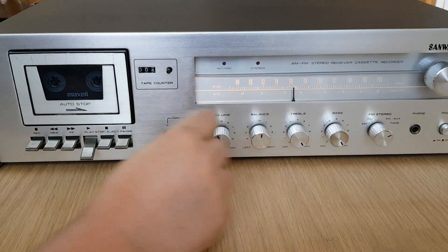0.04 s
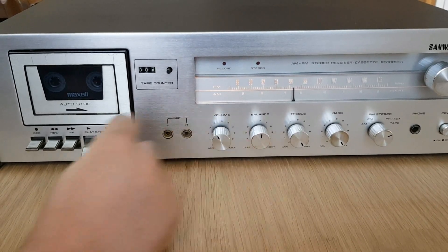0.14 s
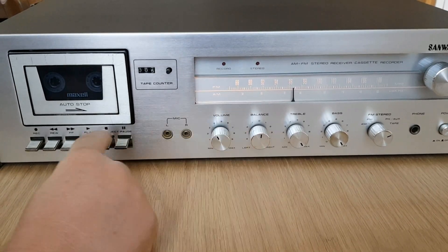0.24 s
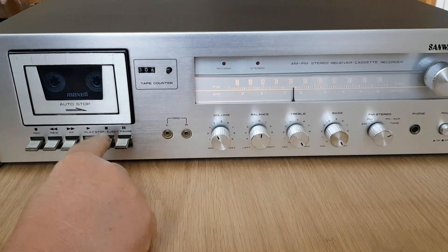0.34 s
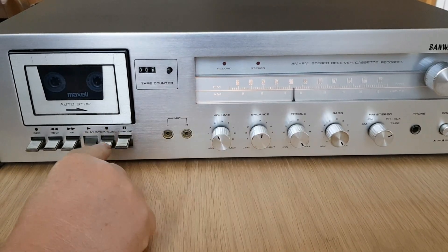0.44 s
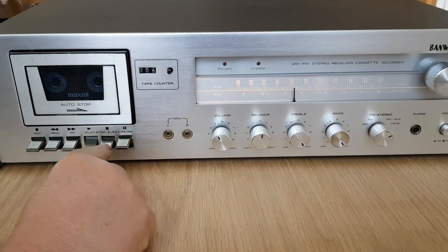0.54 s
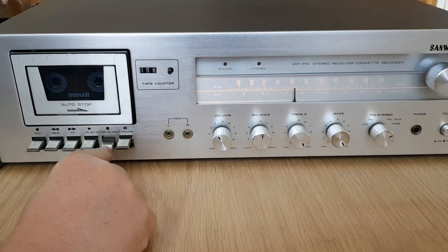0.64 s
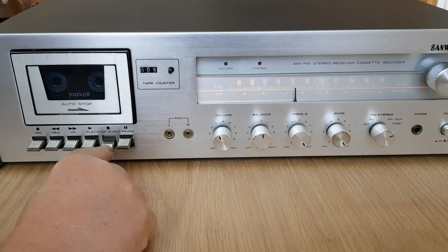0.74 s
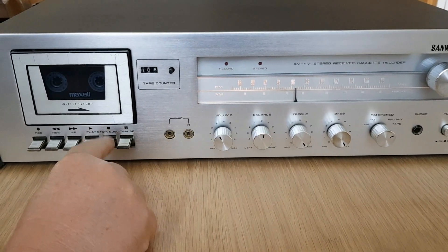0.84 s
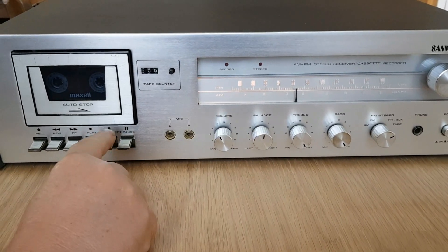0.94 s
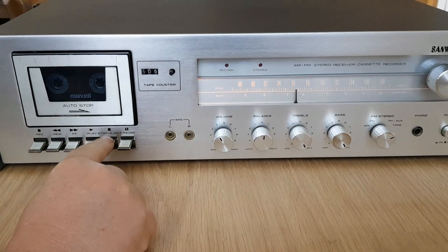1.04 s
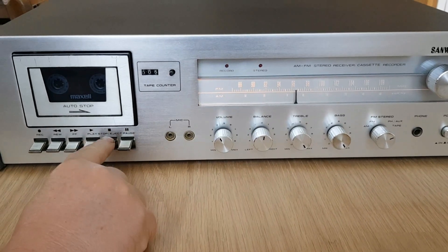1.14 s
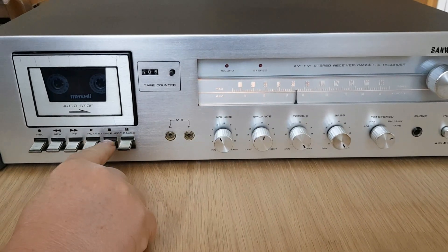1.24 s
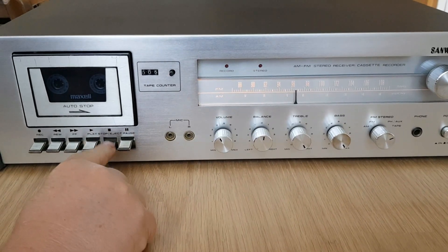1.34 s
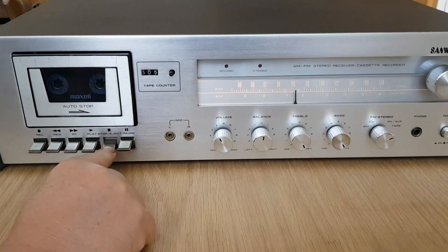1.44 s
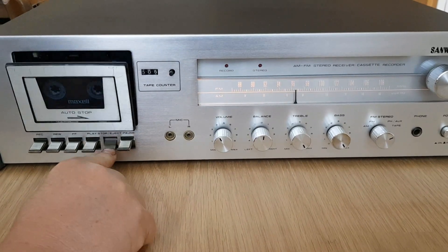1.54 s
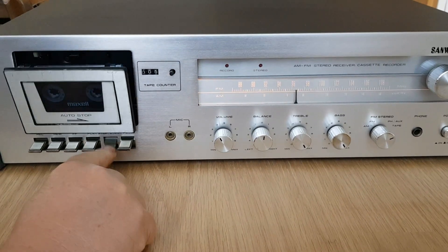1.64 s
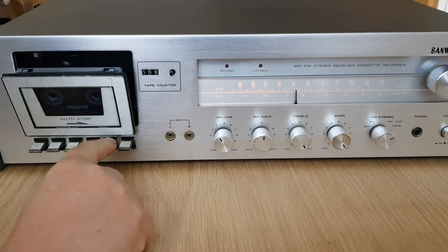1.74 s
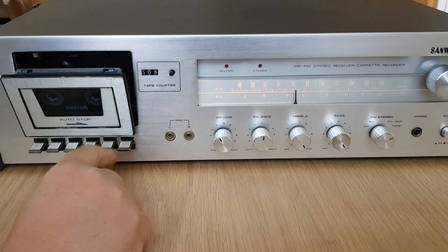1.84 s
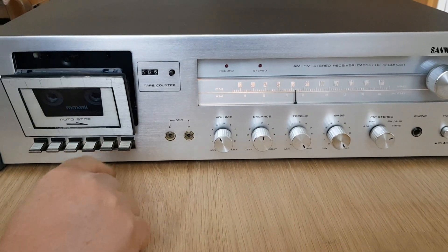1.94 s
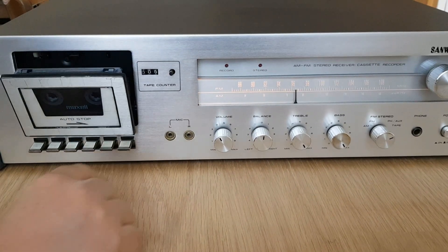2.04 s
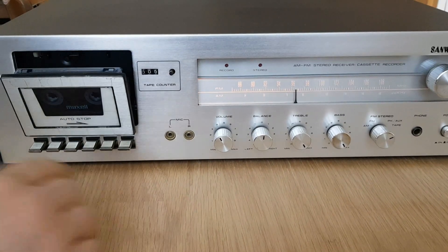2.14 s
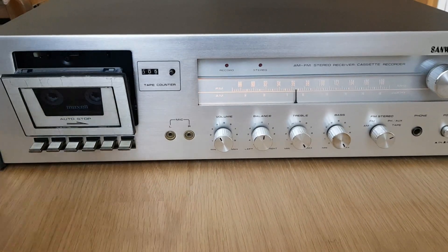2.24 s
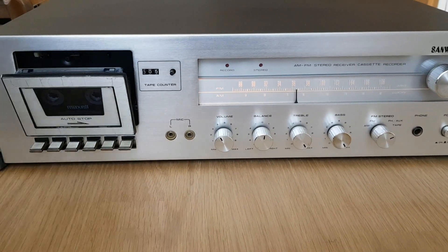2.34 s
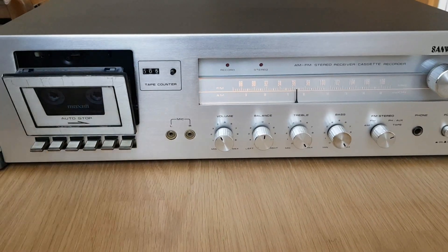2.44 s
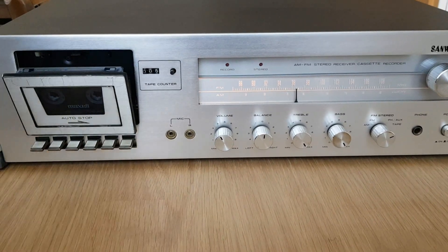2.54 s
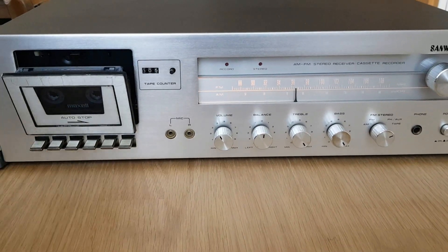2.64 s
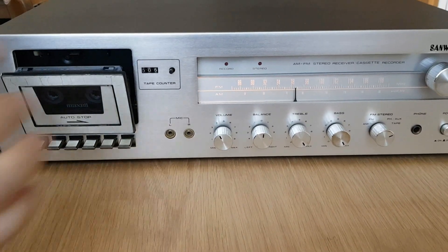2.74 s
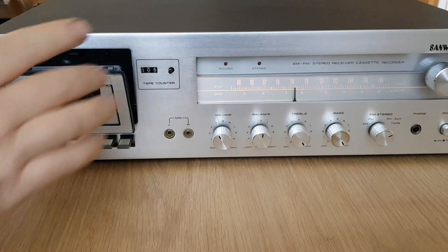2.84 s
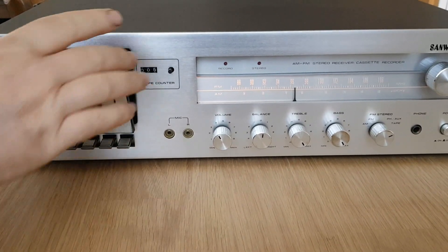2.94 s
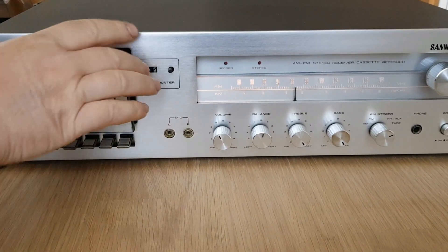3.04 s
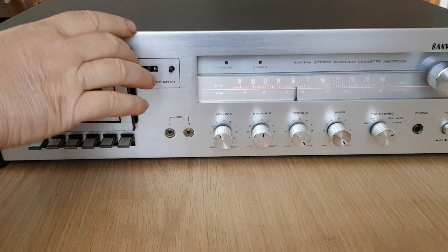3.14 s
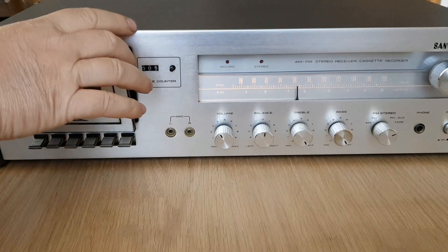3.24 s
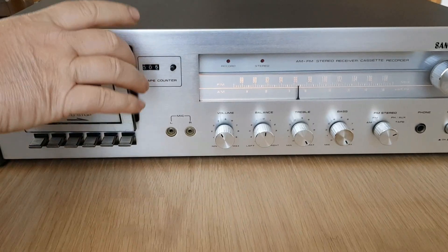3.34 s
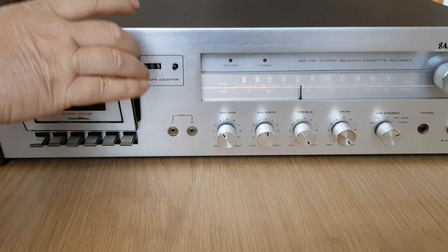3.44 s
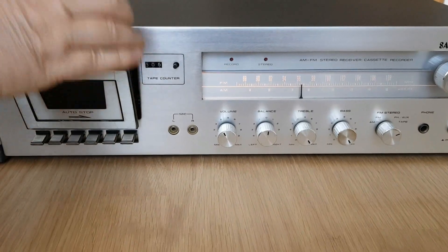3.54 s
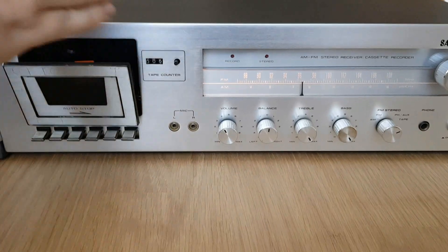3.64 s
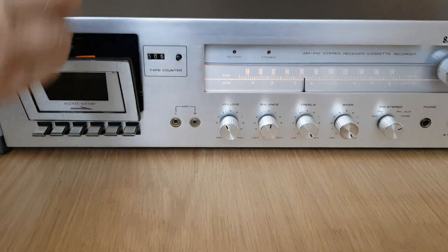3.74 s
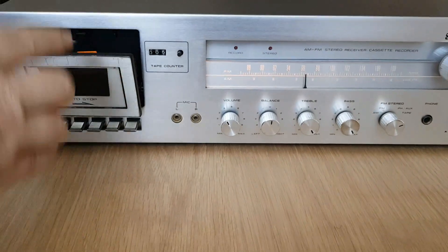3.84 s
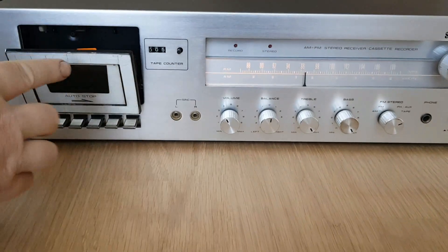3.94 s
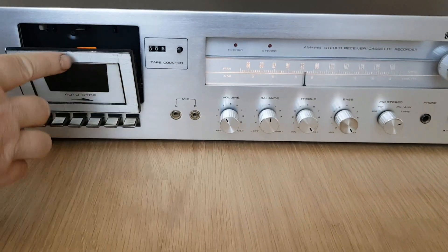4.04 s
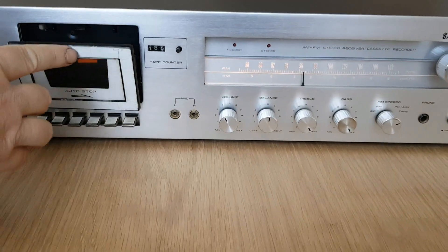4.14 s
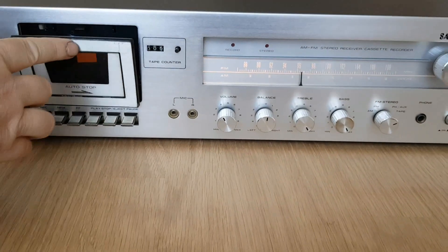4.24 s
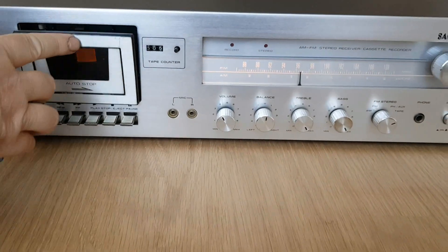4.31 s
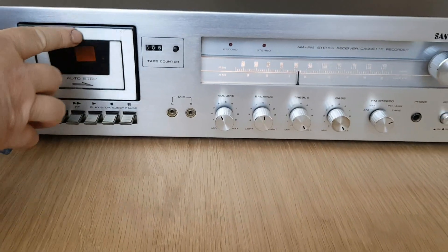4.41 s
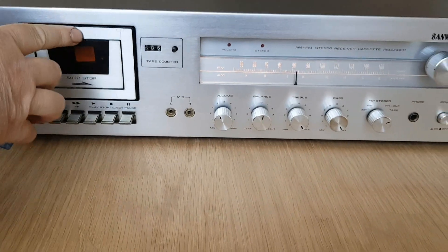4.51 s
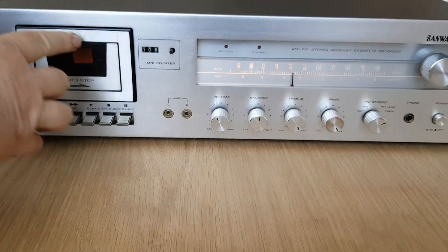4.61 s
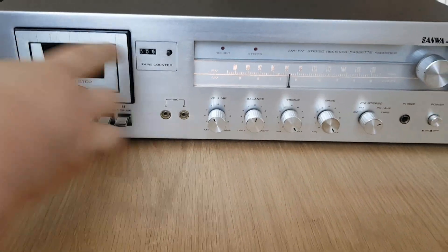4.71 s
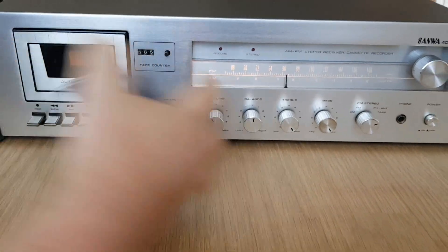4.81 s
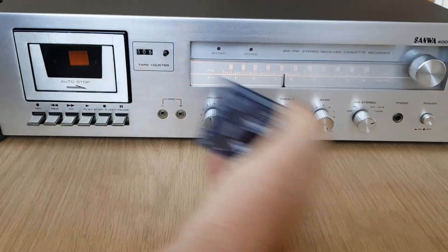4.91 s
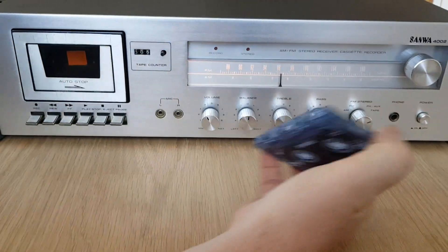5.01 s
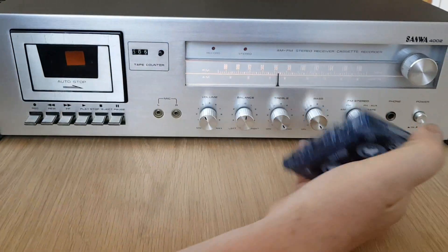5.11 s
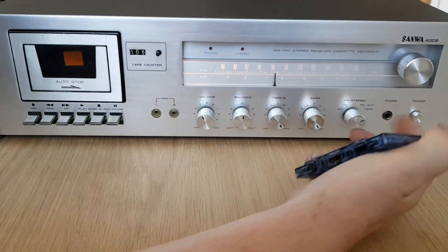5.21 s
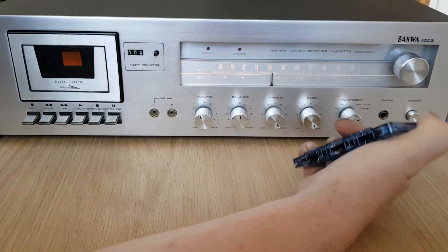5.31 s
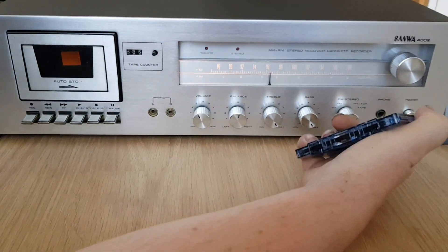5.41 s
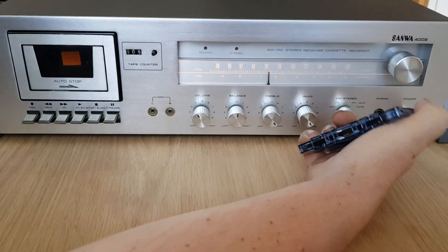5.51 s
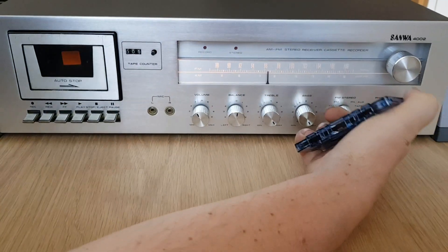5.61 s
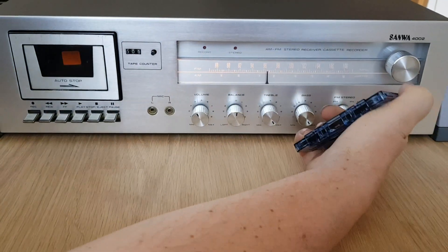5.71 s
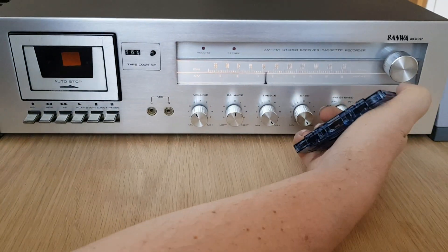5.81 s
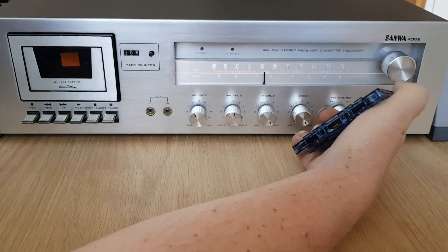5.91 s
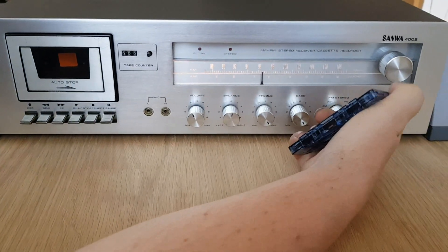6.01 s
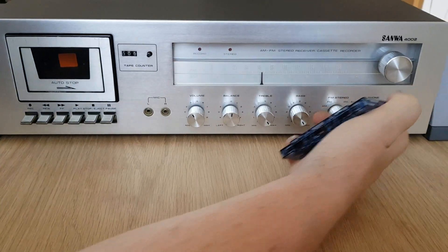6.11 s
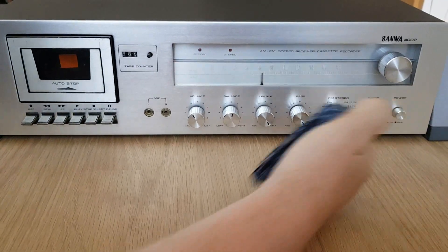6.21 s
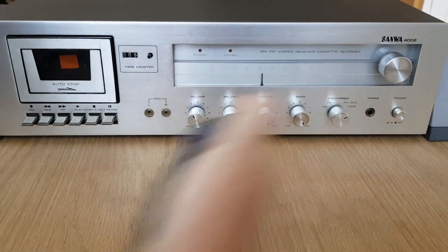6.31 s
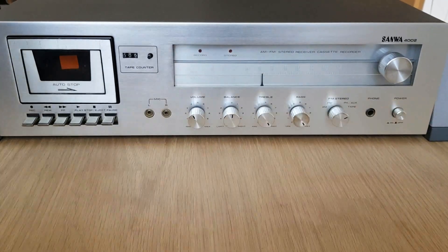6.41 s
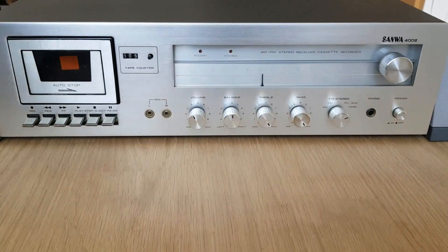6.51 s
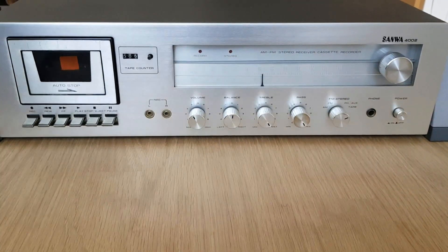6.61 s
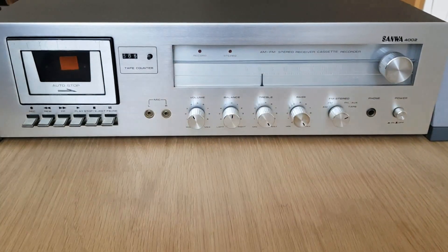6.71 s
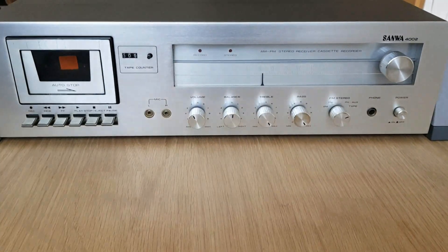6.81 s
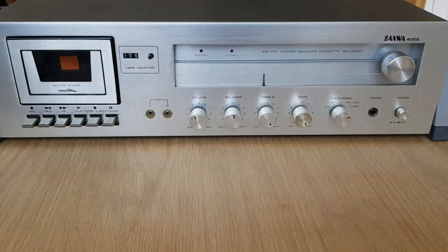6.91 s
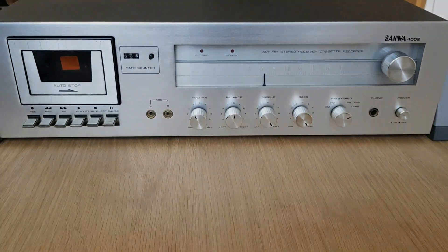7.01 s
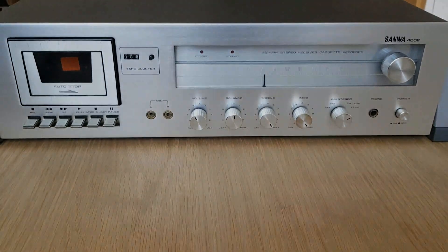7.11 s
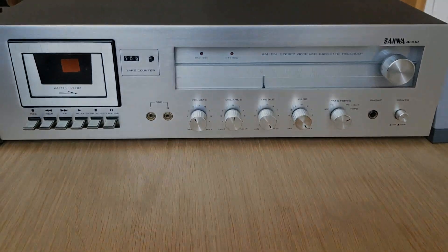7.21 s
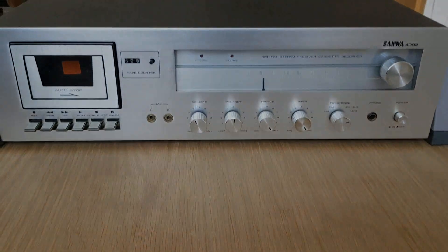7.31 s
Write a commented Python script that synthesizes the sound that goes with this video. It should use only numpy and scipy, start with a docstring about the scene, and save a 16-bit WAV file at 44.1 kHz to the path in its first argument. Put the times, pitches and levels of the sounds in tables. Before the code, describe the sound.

Close metallic and plastic clunks from a tape deck's keys and door, small cassette rattles and handling thuds, over faint hiss in a small room.

```python
"""On a wooden table in a small room, the keys, latch and sprung door of a cassette deck clack beside a camera.
A cassette slides out and rattles in a hand. Each contact is a burst of uneven impacts that rings the metalwork
and knocks the cabinet; slides are clumped grains through the same parts, the door spring is a dying sine.
The left microphone faces the deck; the right one is shadowed and picks up the thuds of the hand that
holds the camera. Under it all lie hiss, a whirr that drops away early and a low hum, all filtered noise."""
import sys
import numpy as np
from scipy import signal
from scipy.fft import rfft, irfft, next_fast_len
from scipy.io import wavfile
from scipy.ndimage import uniform_filter1d, map_coordinates

SR = 44100
rng = np.random.default_rng(int(sys.argv[2]) if len(sys.argv) > 2 else 0)


def to_linear_factor(level_db):
    """Convert decibel levels (scalar or array-like) to linear amplitude factors."""
    exponent = np.asarray(level_db, float) / 20
    return 10 ** exponent


def output_pcm(signal):
    """Save a mono or channel-first signal as 16-bit PCM at the path in sys.argv[1].

    Samples are clipped to [-1, 1] before scaling.
    """
    pcm = np.clip(np.atleast_2d(signal).T, -1, 1) * 32767
    wavfile.write(sys.argv[1], SR, np.round(pcm).astype(np.int16))


N = 324352  # length in samples
SPAN = 32768  # samples in the transform of one contact or stroke
HELD = 0.55  # share of the ring time left while fingers touch the parts

# Metalwork and plastic ringing freely. Each row: pitch in Hz, strength in dB, t60 in s.
METAL_MODES = [(850, 0, 0.08), (1080, -1, 0.09), (1205, -4, 0.12), (1510, -2, 0.12), (1600, -2.5, 0.11),
               (1755, -2, 0.14), (2150, -5, 0.04), (3000, -4, 0.09), (4200, -1, 0.05)]


def unit(x):
    """Scale to rms 1."""
    return x / np.sqrt(np.mean(x ** 2) + 1e-20)


def unit_gain(response):
    """Rms gain of a response for white noise."""
    return np.sqrt(np.mean(np.abs(response) ** 2))


def peak(spectrum):
    """Scale a spectrum so that its wave peaks at 1."""
    return spectrum / np.max(np.abs(irfft(spectrum)))


def along(points, hz):
    """Read (Hz, value) points on a log frequency axis."""
    f, v = np.transpose(points)
    return np.interp(np.log(hz + 1), np.log(f + 1), v)


def wobble(rate):
    """A smooth random curve, rate knots a second."""
    return map_coordinates(rng.standard_normal(int(N * rate / SR) + 4), [np.arange(N) * rate / SR])


def spells(rows, edge_s):
    """Gain that swells at each start, holds and ebbs at each end."""
    t = np.arange(N) / SR
    gain = 0
    for start, end, db in rows:
        rise_and_ebb = np.clip(np.minimum(t - start, end - t) / edge_s + 0.5, 0, 1)
        gain = gain + to_linear_factor(db) * rise_and_ebb ** 2
    return gain


def filtered(x, response):
    """Shape x by a response given as a function of frequency."""
    m = next_fast_len(N + SR // 2)
    return irfft(rfft(x, m) * response(np.fft.rfftfreq(m, 1 / SR)), m)[..., :N]


def broad(f, centre_hz, sharp):
    """One heavily damped band-pass resonance; sharp is its Q."""
    damping = 1j * f * centre_hz / sharp
    return damping / (centre_hz ** 2 - f ** 2 + damping)


def modes(table, f):
    """Causal response of each exponentially decaying mode, one row a mode."""
    hz, db, t60 = np.transpose(table)[:, :, None]
    decay = np.log(1000) / np.maximum(t60, 0.005)
    w = 2 * np.pi
    return to_linear_factor(db) * w * hz / ((decay + 1j * w * f) ** 2 + (w * hz) ** 2)


def struck(table, centre_hz, slope_db):
    """Strength of each mode: falls off by octaves from the centre, a little different at every blow."""
    scatter_db = rng.normal(0, 3, len(table))
    octaves = np.log2(np.transpose(table)[0] / centre_hz)
    return to_linear_factor(scatter_db - slope_db * octaves ** 2)


def damped(table, share):
    """The same modes with scaled ring times, slightly detuned as the parts seat differently."""
    detune = rng.normal(0, 0.008, len(table))  # share of pitch, new at each contact
    rows = np.array(table) * [1, 1, share]
    return rows * [[1 + shift, 1, 1] for shift in detune]


def chatter(n, env, spiky_db):
    """Tiny impacts of very uneven size under an envelope."""
    return env * rng.standard_normal(n) * to_linear_factor(spiky_db * rng.exponential(size=n))


def paths(f, room_db):
    """Direct sound plus a fresh noise tail; low mids arrive most alike, deepest bass and treble differ."""
    # Reverberation of the small room. Each row: frequency in Hz, t60 in s.
    room_t60 = [(100, 0.44), (1500, 0.4), (4000, 0.34), (15000, 0.19)]
    # How alike the near sound is at left and right. Each row: frequency in Hz, likeness from 0 to 1.
    likeness = [(60, 0.2), (250, 1), (640, 0.9), (1200, 0.032)]
    room_bass_hz = 249  # below this the room adds little to the near sound
    t = np.arange(SPAN // 2) / SR
    alike = np.clip(along(likeness, f), 0, 1)
    apart = np.sqrt(1 - alike ** 2)

    hz, s, z = signal.stft(rng.standard_normal((2, len(t))), SR, nperseg=256)
    fading = z * to_linear_factor(-60 * s / along(room_t60, hz)[:, None])
    tail = signal.istft(fading, SR, nperseg=256)[1]
    build_up = 1 - np.exp(-t[:tail.shape[1]] / 0.0011)
    tail = rfft(tail * build_up / np.linalg.norm(tail[0]), SPAN)
    left_tail, right_tail = tail * to_linear_factor(room_db) * f / np.hypot(f, room_bass_hz)

    # sound scatters round the camera body on its way to the right microphone
    round_body = rng.standard_normal(len(t)) * to_linear_factor(-60 * t / 0.018)
    round_body = rfft(round_body / np.linalg.norm(round_body), SPAN)
    left = 1 + left_tail
    right = alike * left + apart * (round_body + to_linear_factor(-0.5) * right_tail)
    return np.array([left, right])


def patchy(depth_db):
    """Stereo noise whose bands drift slowly up and down."""
    z = signal.stft(rng.standard_normal((2, N)), nperseg=512)[2]
    field = rng.standard_normal(z.shape[1:])
    field = uniform_filter1d(field, size=9, axis=0)
    field = uniform_filter1d(field, size=40, axis=1)
    return signal.istft(z * to_linear_factor(depth_db * unit(field)), nperseg=512)[1][:, :N]


def air():
    """Filtered noise: a hiss that fades late, a mid-band whirr that drops away early, a partly shared low hum."""
    # Colour of the hiss. Each row: frequency in Hz, relative level in dB.
    hiss_tone = [(400, -9), (1500, -15), (3000, -16.5), (4500, 1.5), (7000, 0), (16000, 7)]
    # Colour of the hum. Each row: frequency in Hz, relative level in dB.
    hum_tone = [(20, -15.5), (50, 0.5), (110, -2.5), (150, 5), (250, 1), (450, -15.5), (1000, -22.5)]
    # Course of the hum, about which it wavers. Each row: time in seconds, rms level in dB.
    hum_course = [(0, -67), (2.2, -71.5), (4.8, -64.5), (5.2, -68.5), (6.5, -72.5), (7.35, -74.5)]
    hiss_start_db, hiss_fades_s, fade_db_per_s = -61, 6.41, 33
    whirr_start_db, whirr_drops_s, whirr_left_db = -68, 2.1, -78.5
    t = np.arange(N) / SR

    hiss_db = hiss_start_db - fade_db_per_s * np.maximum(t - hiss_fades_s, 0)
    hiss = filtered(patchy(depth_db=3.0), lambda f: to_linear_factor(along(hiss_tone, f)))

    whirr_db = np.interp(t - whirr_drops_s, [-0.1, 0.1], [whirr_start_db, whirr_left_db])
    whirr = filtered(patchy(depth_db=3.0), lambda f: broad(f, 3900, sharp=0.17) ** 2)

    hum = filtered(rng.standard_normal((2, N)), lambda f: to_linear_factor(along(hum_tone, f)))
    hum[1] = 0.5 * hum[0] + 1.1 * hum[1]
    course_s, course_db = np.transpose(hum_course)
    hum_db = np.interp(t, course_s, course_db) + 2.5 * wobble(2.3)
    return to_linear_factor(hiss_db) * unit(hiss) + to_linear_factor(whirr_db) * unit(whirr) + to_linear_factor(hum_db) * unit(hum)


def deck():
    """Each contact chatters briefly, rings the parts near where it lands, snaps and knocks the cabinet."""
    # Cabinet and table top. Each row: pitch in Hz, strength in dB, t60 in s.
    cabinet_modes = [(132.7, 0, 0.55), (215, 3, 0.16), (300, -5, .1), (420, 0, 0.07), (485, -1, 0.09),
                     (620, 1, 0.06)]
    # Keys, latch and door land. Each row: time in seconds, peak of the direct clack in dB,
    # cabinet knock and treble snap in dB against that peak, centre of the ring in Hz.
    clacks = [(0.401, -52.5, 0.5, 4, 1040), (0.5915, -10.5, -18, 2.5, 5000), (0.6002, -14.5, -23, -6, 2745),
              (0.6048, -19, -3, -7, 982), (0.779, -15.5, -32, -21, 3820), (0.7811, -10, -21.5, -19, 1080),
              (1.1745, -56, -0.5, -14, 1470), (1.3404, -26, -11.5, -4, 3020),
              (1.4304, -16.5, -39, -14, 1533), (1.434, -13, -16.5, -18, 1555),
              (1.4452, -15.5, -21, -5.5, 2330), (1.4563, -14.5, -27, -6.5, 1590),
              (1.46, -15, -13.5, -8.5, 4350), (1.4687, -16.5, -29, -14, 1710), (1.6195, -21, -27, -8, 4400),
              (1.656, -25, -15, -20, 946), (3.1447, -26, -25, -24, 1650), (3.16, -25, -13.5, -22.5, 1540),
              (4.393, -19.5, -20.5, -0.5, 4270), (4.408, -16, -14, -5.5, 2500),
              (4.4226, -29, 1.5, -10.5, 940), (6.017, -25.5, -16.5, -5, 1473)]
    # The cassette and fingers tick lightly. Each row: time in seconds, peak of the direct clack in dB,
    # treble snap in dB against that peak, centre of the ring in Hz.
    ticks = [(2.986, -50.5, -10, 3070), (3.535, -41, -13.5, 3830), (3.669, -41.5, -5.5, 1640),
             (3.748, -40, -10.5, 2640), (3.7788, -37.5, -12, 1395), (3.934, -50.5, 11.5, 5360),
             (4.136, -42.5, -17, 2080), (4.201, -43.5, -20.5, 1330), (4.7648, -62.5, 20.5, 4780),
             (4.887, -39.5, -24, 1490), (5.057, -47, 9.5, 4200), (5.1356, -45, 11.5, 4500),
             (5.184, -38, 7.5, 3050), (5.8385, -46.5, -1, 1560), (6.4418, -47, 3, 5050),
             (6.452, -56, -21, 1430), (6.757, -49, 11, 5400)]
    knock_hz, tick_knock_db = 245, -31.5  # where blows shake the cabinet; knock of a tick
    clack_chatter_s, tick_chatter_s = 0.026, 0.05  # t60 of the chatter for a ring centred on 1500 Hz
    clack_sharp, tick_sharp = 0.85, 2.4  # hollow plastic answers with a clearer pitch
    lead_s, lead_db = 0.005, -24  # a faint rise ahead of each blow
    knock_lag_s = 0.005  # the cabinet rocks on the table a moment after the blow

    out = np.zeros((2, N + SPAN))
    f = np.fft.rfftfreq(SPAN, 1 / SR)
    t = np.arange(SPAN // 8) / SR
    lands = np.maximum(t - lead_s, 0)
    lead_in = to_linear_factor(lead_db) * t / lead_s * (lands == 0)
    attack = (1 - np.exp(-lands / 0.0014)) ** 2
    cabinet = modes(cabinet_modes, f)
    # the cabinet gets a slower shove, and the deepest bass is not radiated
    delay = np.exp(-2j * np.pi * f * (lead_s + knock_lag_s))
    push = delay * 1j * f / (90 + 1j * f) / (1 + 2j * np.pi * f * 0.0003) ** 2

    contacts = [(*row, 1, clack_chatter_s, clack_sharp) for row in clacks]
    for s, db, snap_db, ring_hz in ticks:
        contacts.append((s, db, tick_knock_db, snap_db, ring_hz, HELD, tick_chatter_s, tick_sharp))

    for s, db, knock_db, snap_db, ring_hz, share, chatter_s, sharp in contacts:
        t60 = chatter_s * (1500 / ring_hz) ** 0.2  # duller contacts are softer and chatter longer
        env = to_linear_factor(-60 * lands / t60) * (attack + lead_in)
        blow = rfft(chatter(len(t), env, spiky_db=2.5), SPAN)

        ring = struck(METAL_MODES, ring_hz, slope_db=21.5) @ modes(damped(METAL_MODES, share), f)
        near = broad(f, ring_hz, sharp) ** 2
        far = broad(f, 2000, sharp=0.36)
        wide = to_linear_factor(0.15 * db)  # harder blows rattle more of the whole band
        body = 0.7 * ring / unit_gain(ring) + 1.24 * near / unit_gain(near)
        clack = peak(blow * (body + 2.7 * wide * far / unit_gain(far)))

        snap = peak(blow * broad(f, 9800, sharp=0.39) ** 2) * to_linear_factor(snap_db)

        boom = struck(cabinet_modes, knock_hz, slope_db=3.5) @ cabinet
        boom = boom / np.max(np.abs(boom)) + 0.13 * broad(f, 280.0, sharp=0.48)
        knock = peak(push * boom) * to_linear_factor(knock_db)

        contact = to_linear_factor(db) * (clack + snap + knock)
        start = round((s - lead_s) * SR)
        out[:, start:][:, :SPAN] += irfft(contact * paths(f, room_db=-5), SPAN)
    return out[:, :N]


def grip():
    """The hand shifts on the camera: dull decaying sines over a lumpy noise rumble, mostly at the right."""
    # Thuds of the grip. Each row: time in seconds, level in dB ahead of the side gains, pitch in Hz.
    thuds = [(2.502, -50, 67.5), (2.828, -44.5, 122), (3.239, -43.5, 145), (3.587, -42.5, 150),
             (3.747, -29, 125), (3.772, -35.5, 72.5), (4, -35, 125), (4.025, -37, 55.2),
             (5.529, -49.5, 42.7), (6.52, -46.5, 64.3), (6.757, -46, 91), (3.042, -49, 87),
             (3.287, -46, 137), (6.458, -50.5, 73), (6.926, -55, 98), (6.395, -50, 110), (6.65, -50.5, 140)]
    # Spells of hand movement. Each row: start and end in seconds, rumble in dB ahead of the side gains.
    movements = [(2.45, 4.2, -62.5), (4.2, 5.65, -68.5), (6.25, 7.05, -64)]
    # Colour of the rumble. Each row: frequency in Hz, relative level in dB.
    rumble_tone = [(15, -22.5), (40, 9), (90, 9), (200, -4), (900, -49.5)]
    rest_db, edge_s = -87, 0.23  # rumble of the resting hand ahead of the side gains; swell of a movement
    side_gains = to_linear_factor([[-12], [15]])  # left, right in dB

    thumps = np.zeros(N + SR)
    t = np.arange(SR // 4) / SR
    for s, db, hz in thuds:
        swing = np.sin(2 * np.pi * hz * t) * (1 - np.exp(-t / 0.00017))
        fall_db = 60 * t * hz / 7  # 60 dB in seven cycles
        thumps[round(s * SR):][:len(t)] -= to_linear_factor(db - fall_db) * swing

    lumpy = rng.standard_normal((2, N)) * to_linear_factor(1.0 * wobble(21))
    rumble = filtered(lumpy, lambda f: to_linear_factor(along(rumble_tone, f)))
    movement = to_linear_factor(rest_db) + spells(movements, edge_s)
    return (thumps[:N] + movement * unit(rumble)) * side_gains


def rubbing():
    """Plastic slips in clumps of grains that lightly ring the same parts; skin and cloth only rustle."""
    # Plastic slides and creaks, strongest as it breaks loose. Each row: start in seconds, level in dB,
    # t60 in s, centre of the ring in Hz, treble in dB against the ring.
    rubs = [(2.999, -71.5, 0.68, 1110, -41), (3.345, -53, 0.6, 1640, -7.5), (3.365, -51, 0.52, 2980, -11.5),
            (3.405, -47, 0.4, 1700, -6.5), (4.9, -54, 0.35, 1250, 2.5), (5.188, -46, 0.089, 3650, 9.5),
            (5.825, -63.5, 0.3, 740, 3), (5.98, -56, 0.58, 578, -5.5), (6.649, -62, 0.24, 1385, 0.5),
            (7.062, -65.5, 0.37, 825, 1.5)]
    # Skin and sleeve brush past. Each row: start and end in seconds, level in dB ahead of the room.
    rustles = [(4.9, 5.6, -63), (6.04, 6.33, -55)]
    rub_rise_s, rustle_edge_s = 0.0071, 0.22

    near = np.zeros(N + SR)
    f = np.fft.rfftfreq(SPAN, 1 / SR)
    t = np.arange(SPAN // 2) / SR
    bright = broad(f, 3500, sharp=0.27) ** 2 * (f > 2500)
    clumps = to_linear_factor(2.5 * wobble(90))
    for s, db, t60, ring_hz, treble_db in rubs:
        start = round(s * SR)
        stroke = to_linear_factor(-60 * t / t60) * (1 - np.exp(-t / rub_rise_s))
        stroke = stroke * np.roll(clumps, -start)[:len(t)]
        grains = rfft(chatter(len(t), stroke, spiky_db=2.5), SPAN)
        ring = struck(METAL_MODES, ring_hz, slope_db=14) @ modes(damped(METAL_MODES, HELD), f)
        body = ring / np.max(np.abs(ring)) + 0.21 * broad(f, ring_hz, sharp=1.02) ** 2
        colour = body / unit_gain(body) + to_linear_factor(treble_db) * bright / unit_gain(bright)
        near[start:][:SPAN] += to_linear_factor(db) * irfft(grains * colour)

    fine = chatter(N, np.sqrt(clumps), spiky_db=1)
    rustle = unit(filtered(fine, lambda hz: broad(hz, 6200, sharp=0.36) ** 2))
    near = near[:N] + spells(rustles, rustle_edge_s) * rustle
    return signal.fftconvolve(near[None], irfft(paths(f, room_db=-9.0), SPAN), axes=1)[:, :N]


def spring():
    """The door spring hums after the door shuts: a faint, slow-dying sine."""
    # Hum of the door spring. The only row: start in seconds, pitch in Hz, level in dB, t60 in s.
    door_spring = (4.45, 502, -64, 1.5)
    s, hz, db, t60 = door_spring
    t = np.maximum(np.arange(N) / SR - s, 0)
    swell = 1 - np.exp(-t / 0.03)
    return to_linear_factor(db - 60 * t / t60) * np.sin(2 * np.pi * hz * t) * swell


def scene():
    """All sources at the two microphones."""
    return air() + deck() + grip() + rubbing() + spring()


def roll_off(x):
    """The treble ends steeply here."""
    return signal.sosfilt(signal.butter(12, 16830, fs=SR, output="sos"), x)


def record(dry):
    """Each microphone has its own colour; the electronics add a faint hiss; the top of the band is cut."""
    # Microphone facing the deck. Each row: frequency in Hz, gain in dB.
    left_colour = [(300, 11), (5000, 4.5), (6300, 0.5), (7600, -8.5), (11200, 4), (16000, -2.5)]
    # Shadowed microphone. Each row: frequency in Hz, gain in dB.
    right_colour = [(300, -4), (2000, -10.5), (4400, -23), (7500, -21), (9500, -4.5), (11200, 1),
                    (13000, -10.5), (16000, -9)]
    hiss_colour = [(300, 12.0), (7500, -11.0), (11000, -5.0)]  # Hz, dB
    top_hz = 15900
    heard = filtered(dry, lambda f: to_linear_factor([along(left_colour, f), along(right_colour, f)]))
    hiss = filtered(rng.standard_normal(dry.shape), lambda f: to_linear_factor(along(hiss_colour, f)))
    mix = filtered(heard + to_linear_factor(-74) * hiss, lambda f: f < top_hz)
    return roll_off(mix)


dry = scene()
out = record(dry)
output_pcm(out)
```